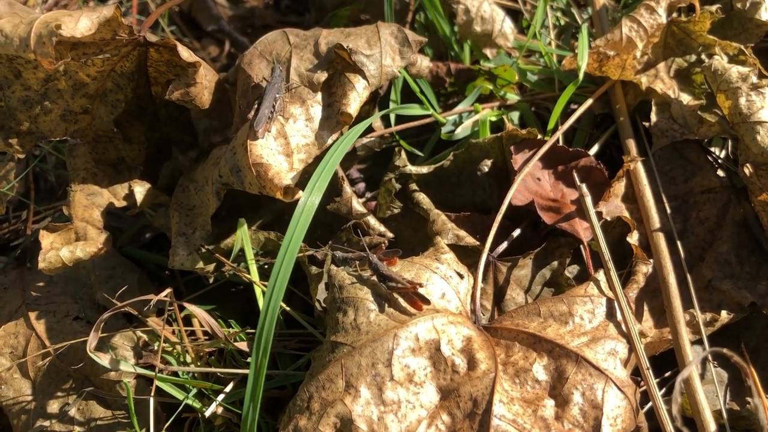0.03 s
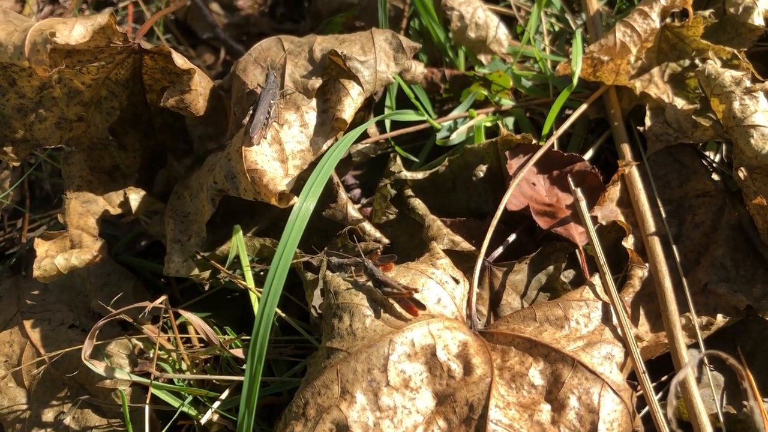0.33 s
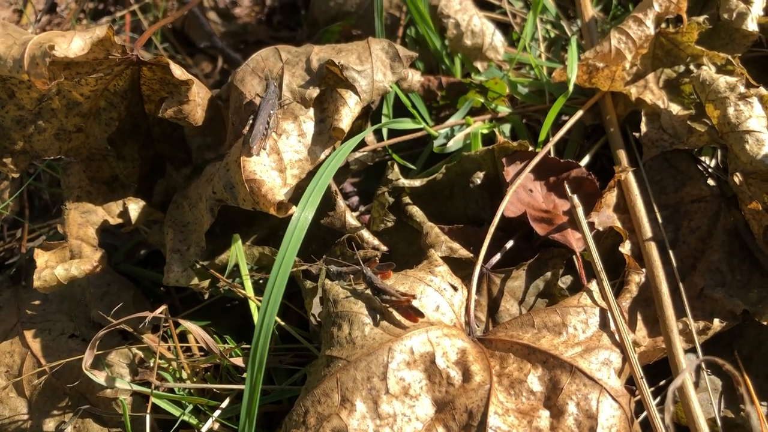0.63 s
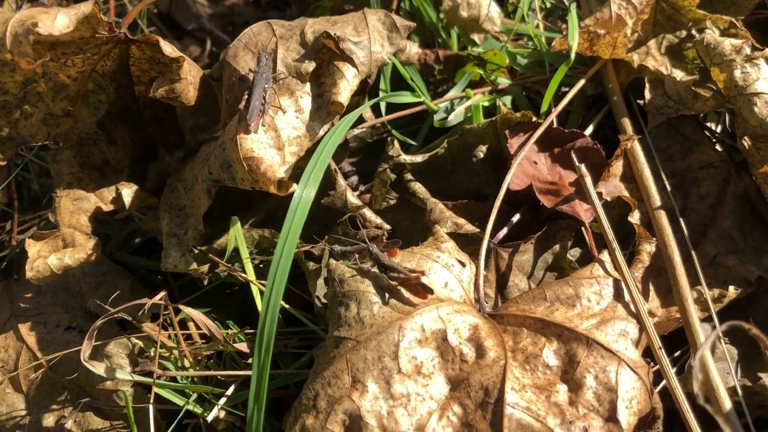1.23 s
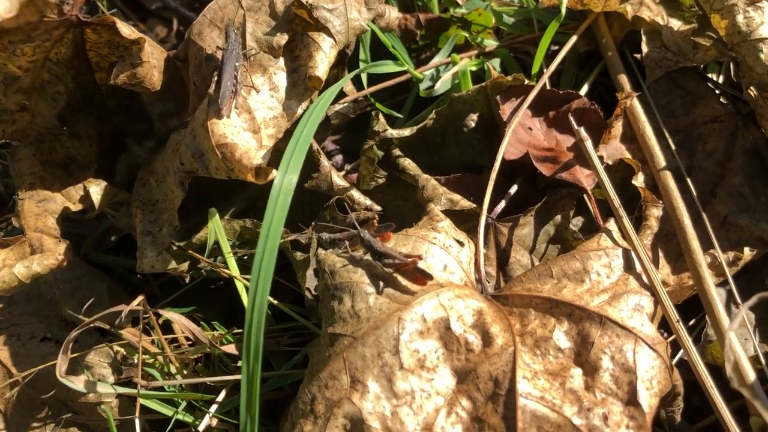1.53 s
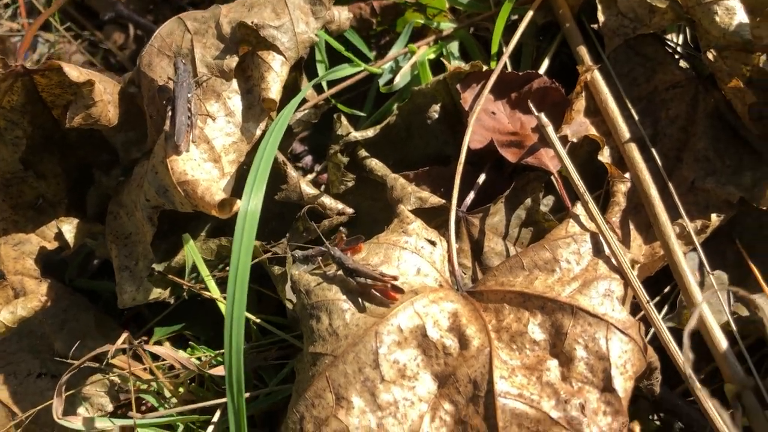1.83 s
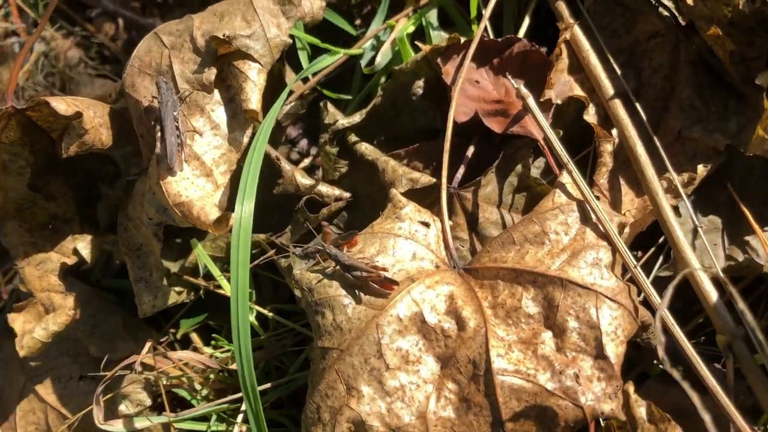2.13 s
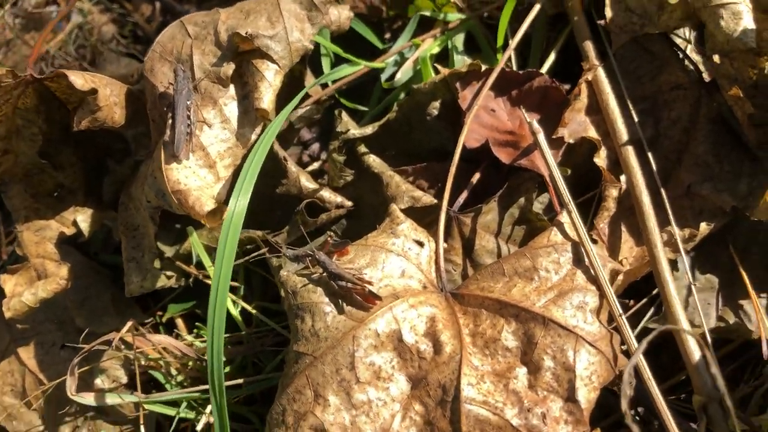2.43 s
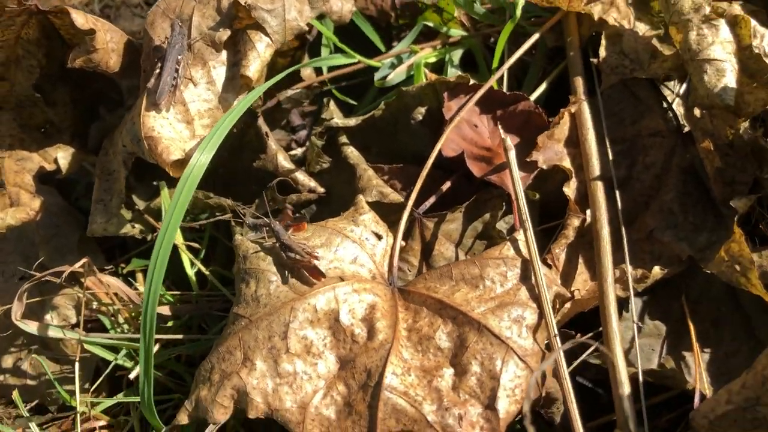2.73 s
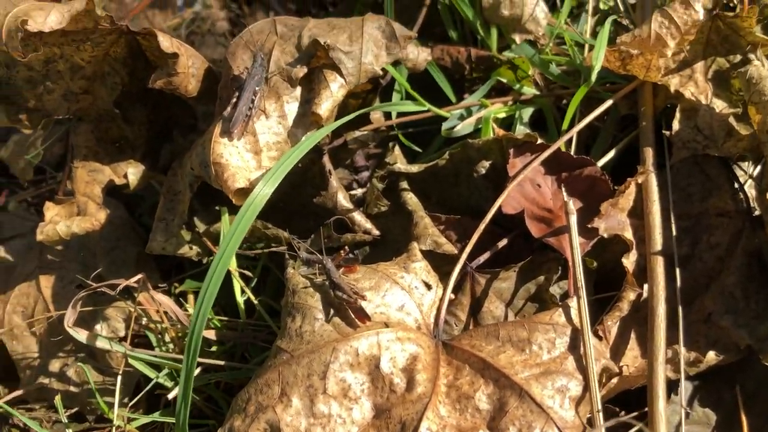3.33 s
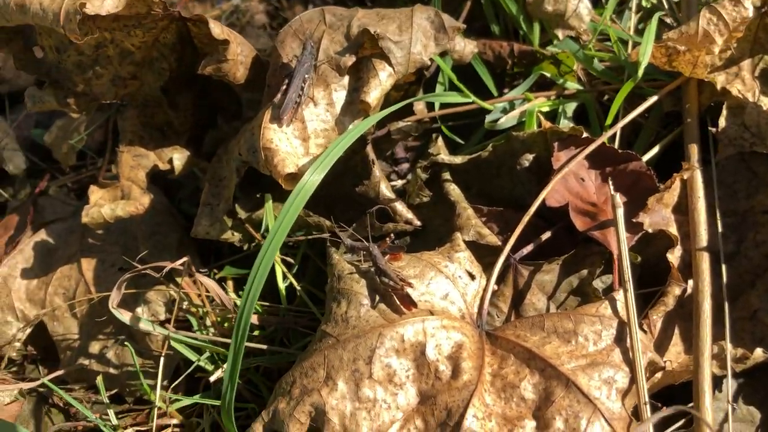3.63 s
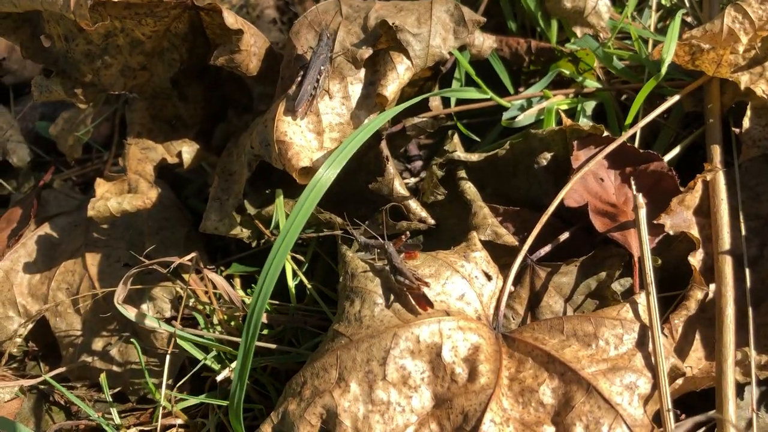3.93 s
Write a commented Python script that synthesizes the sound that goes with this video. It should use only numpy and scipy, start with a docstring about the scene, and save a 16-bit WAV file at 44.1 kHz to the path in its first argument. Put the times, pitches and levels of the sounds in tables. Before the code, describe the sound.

A grasshopper chirps close by, eleven short, high rasps from about 0.2 to 3.1 seconds, roughly a third of a second apart, each a burst of quick scrapes. Dry leaves tick faintly near 1.9 and 2.9 seconds, then crackle in small crisp clusters from 3.1 to 3.8 seconds. Throughout, distant traffic rumbles softly with a wavering engine drone under a faint hiss.

```python
"""On sunlit dry leaves a grasshopper rasps eleven short chirps, each a burst of quick scrapes
of its leg files over the wings. Around the last chirp and just after it the leaves crackle as
their fibres snap, and the litter scatters every close sound. Far traffic rumbles, with a fading
tyre roar and two droning engines, under a faint hiss."""
import sys
import numpy as np
from scipy import signal
from scipy.fft import rfft, irfft
from scipy.io import wavfile

SR = 44100
rng = np.random.default_rng(int(sys.argv[2]) if len(sys.argv) > 2 else 0)


def transcribe(u):
    """Save the signal u as a 16-bit wav file named by the first command-line argument.

    u: samples, shape (n,) or (channels, n), limited to [-1, 1]; the rate is SR.
    q: integer samples, one column per channel.
    """
    v = np.clip(np.atleast_2d(u).T, -1, 1)
    q = np.round(v * 32767).astype(np.int16)
    wavfile.write(sys.argv[1], SR, q)


N = 176400

# strokes of a leg file: (centre time [s], nominal length [s], level [dB], treble over bass [dB])
LEG_SCRAPES = [(0.226, 0.012, -51.5, -3), (0.247, 0.0088, -48, 2.5), (0.261, 0.0071, -41.5, 5),
               (0.265, 0.0036, -32, 11.5), (0.2793, 0.0056, -40, 9.5), (0.2916, 0.004, -38.5, 6),
               (0.299, 0.01, -38, 13), (0.3155, 0.0049, -38.5, 12.5), (0.5174, 0.015, -52.5, -0.0),
               (0.526, 0.0074, -56, 1.1), (0.5355, 0.0044, -42.5, -2), (0.5406, 0.0068, -48.5, -3.5),
               (0.547, 0.0036, -39.5, -1), (0.552, 0.0044, -43, -1), (0.5562, 0.0043, -30.5, 13.5),
               (0.563, 0.0055, -42, 9.5), (0.5761, 0.0065, -40.5, 8), (0.5837, 0.006, -35, 14.5),
               (0.5979, 0.0045, -43.5, 8.5), (0.819, 0.013, -53, 1.4), (0.8366, 0.0064, -44, 0.5),
               (0.8469, 0.0043, -40, -1.3), (0.8565, 0.0043, -31, 12.5), (0.8634, 0.0058, -38, 2),
               (0.8764, 0.0064, -38, 9.5), (0.8836, 0.0071, -37.5, 8), (0.8903, 0.0056, -51, 1.5),
               (0.898, 0.0048, -38.0, 10), (0.9073, 0.01, -52, -1.4), (1.1504, 0.017, -51.5, -1.5),
               (1.1651, 0.0072, -44.5, -3.5), (1.1719, 0.0057, -50, -0.8), (1.1781, 0.0049, -34, 2.5),
               (1.1838, 0.0059, -41, 6), (1.1887, 0.0026, -38, 0), (1.196, 0.004, -35, 6.5),
               (1.203, 0.0045, -41, 12.5), (1.216, 0.0071, -55.5, 0.86), (1.4948, 0.0076, -52, -1.3),
               (1.5129, 0.0056, -40, -0.9), (1.5243, 0.0039, -29.5, 10.5), (1.532, 0.0074, -43, 5),
               (1.543, 0.0037, -39, -0.7), (1.5487, 0.0037, -36.5, 3.5), (1.555, 0.006, -38.5, 6),
               (1.5614, 0.0058, -48.5, 0.9), (1.572, 0.0063, -42, -0.74), (1.578, 0.0054, -49, -4),
               (1.5884, 0.016, -52.5, -1), (1.761, 0.017, -53.5, 0.5), (1.7892, 0.0054, -34.5, 3),
               (1.8108, 0.0043, -42, 11.5), (1.8202, 0.0031, -31, 14), (1.8277, 0.0037, -34, 9.5),
               (1.84, 0.0036, -32, 12.0), (1.849, 0.004, -39, 5.5), (1.865, 0.005, -43, 6),
               (2.0496, 0.01, -49, 4), (2.069, 0.0097, -45, 0.8), (2.0877, 0.0042, -47.5, -2.5),
               (2.0942, 0.0045, -47, -1.65), (2.1015, 0.0047, -43.5, -3.5), (2.113, 0.0031, -51.5, -2.5),
               (2.1203, 0.011, -54.5, 1.5), (2.2535, 0.014, -50.5, -1.2), (2.2718, 0.0055, -45.5, 1),
               (2.2836, 0.0043, -34.5, 8), (2.293, 0.0046, -32, 13), (2.2986, 0.005, -40.5, 4),
               (2.3123, 0.0027, -32, 13.5), (2.3216, 0.0057, -35.5, 15), (2.3308, 0.0052, -41, 6),
               (2.3384, 0.007, -39.5, 10.5), (2.3435, 0.0023, -33.5, 14.5), (2.3546, 0.0036, -34.5, 9.5),
               (2.3615, 0.0061, -49.5, 3.5), (2.5883, 0.0148, -54, -4), (2.6062, 0.0052, -42, -5),
               (2.618, 0.0045, -37, 4.5), (2.6239, 0.0079, -50, 6.5), (2.6297, 0.0042, -44, -1.4),
               (2.6357, 0.0065, -42.5, 3.5), (2.6442, 0.004, -42, 10), (2.6483, 0.0063, -44.5, -3),
               (2.66, 0.0092, -48, -2.5), (2.667, 0.0053, -38.5, 0.5), (2.6824, 0.014, -56.5, -1),
               (2.8096, 0.016, -56, -4), (2.829, 0.004, -48, -2), (2.841, 0.0042, -43.5, -0.5),
               (2.8513, 0.0051, -31, 16.5), (2.8566, 0.0065, -45, 3.5), (2.872, 0.003, -34.5, 14),
               (2.8795, 0.0063, -36, 14), (2.8927, 0.0057, -34.5, 12.5), (2.9002, 0.0058, -36.5, 6.5),
               (2.9144, 0.0064, -36.5, 14.5), (3.0854, 0.0091, -51, -1), (3.105, 0.0075, -44.5, -4),
               (3.1154, 0.0049, -35, 2), (3.125, 0.0045, -40.5, 1.5), (3.135, 0.0047, -48.5, -7)]
# resonant colour of the wings: (frequency [Hz], relative gain [dB])
WING_COLOUR = [(600, -42), (1500, -22), (2500, -8.5), (3200, -11), (3700, -4.5), (4100, -8), (5000, -2.5),
               (7000, -1), (8900, 2.5), (10500, -2.5), (12500, -4.5), (16000, -6)]
# resonant colour of the dry leaves: (frequency [Hz], relative gain [dB])
LEAF_COLOUR = [(250, -1), (700, -2.5), (1050, -11.5), (1400, -0.5), (1900, -4.5), (3200, -1.5), (4800, 1),
               (7500, -1.5), (10000, -7.5), (15500, -12)]


def from_db(db):
    """Decibels to gain."""
    return 10 ** (np.asarray(db) / 20)


def rms_one(x):
    """Scale to an rms of one."""
    return x / np.sqrt(np.mean(x ** 2) + 1e-20)


def automation(rows):
    """Each column of a breakpoint curve at every sample."""
    times, *columns = np.transpose(rows)
    return [np.interp(np.arange(N) / SR, times, column) for column in columns]


def drift(rate_hz):
    """Smooth random motion with an rms of one, mostly slower than rate_hz."""
    hz = np.arange(N // 2 + 1) * SR / N
    return rms_one(irfft(rfft(rng.standard_normal(N)) / (1 + (hz / rate_hz) ** 2), N))


def coloured(x, points):
    """Minimum-phase EQ through the given points; keeps the level of white noise."""
    size = 2 * N
    hz, db = np.transpose(points)
    gain = rms_one(from_db(np.interp(np.log(np.arange(N + 1) * SR / size + 1), np.log(hz), db)))
    cepstrum = irfft(np.log(gain))
    cepstrum[1:N] *= 2
    cepstrum[N + 1:] = 0
    return irfft(rfft(x, size) * np.exp(rfft(cepstrum)))[:N]


def crossover(x, hz):
    """Bass and treble halves that add up flat."""
    halves = [signal.butter(2, hz, kind, fs=SR, output="sos") for kind in ("low", "high")]
    return [signal.sosfilt(np.vstack([sos, sos]), x + 1e-18) for sos in halves]


def butterworth(x, order, hz, kind):
    """Low-, high- or band-pass filter."""
    return signal.sosfilt(signal.butter(order, hz, kind, fs=SR, output="sos"), x)


def add(out, start_s, sound):
    """Mix a sound in from its start time."""
    i = int(start_s * SR)
    out[i:i + len(sound)] += sound[:N - i]


def faint_hiss():
    """A steady, airy bed of noise."""
    # colour of the hiss: (frequency [Hz], relative gain [dB])
    hiss_colour = [(1000, -2.5), (3000, 6), (5000, 0.5), (7000, 1), (9500, 0.5), (11300, 11), (12400, 8),
                   (13600, 1), (15500, 1.5)]
    return from_db(-74.5) * coloured(rng.standard_normal(N), hiss_colour)


def traffic_rumble():
    """Far traffic merges into a low, gently wavering noise."""
    # colour of the rumble: (frequency [Hz], relative gain [dB])
    rumble_colour = [(33, -28.5), (52, -3), (80, -2), (115, -0.5), (140, -3), (180, 1), (225, -7),
                     (300, -11), (450, -21), (700, -27), (1100, -30), (2200, -35.5), (5000, -51)]
    return from_db(-56.5 + drift(6.7)) * coloured(rng.standard_normal(N), rumble_colour)


def tyre_roar():
    """A far vehicle's tyres give a band of noise that wavers as it fades."""
    # fade of the roar: (time [s], level [dB])
    fade = [(.6, -73), (1.9, -78.5)]
    level_db, = automation(fade)
    roar = rms_one(butterworth(rng.standard_normal(N), 2, (300, 640), "band"))
    return from_db(level_db + 2 * drift(11)) * roar


def far_engines():
    """Two engines sink slowly in pitch; only their wavering firing notes carry this far."""
    # firing note of each engine: (time [s], pitch [Hz], level [dB])
    low_engine = [(0, 103.5, -57), (.3, 100.7, -56), (.5, 102.2, -51.5), (.72, 100.8, -61),
                  (.88, 100.8, -52.5), (1.2, 96.74, -70)]
    high_engine = [(0, 205, -66.5), (1.1, 200, -64.5), (1.3, 198, -55.5), (1.7, 194, -65), (2, 190, -56.5),
                   (2.4, 188, -52), (2.8, 183, -60.5), (3.1, 181, -67.5), (3.45, 178, -73.5),
                   (3.8, 175, -49.5), (4, 171, -61.5)]
    out = np.zeros(N)
    for engine in (low_engine, high_engine):
        hz, db = automation(engine)
        phase = 2 * np.pi * np.cumsum(hz * (1 + .003 * drift(9.1))) / SR
        out += from_db(db + drift(3.6)) * np.sin(phase)
    return out


def litter_scatter(x):
    """Dense, quickly dying reflections from the leaves around."""
    level_db, t60_s = -27.5, .038
    t = np.arange(SR // 10) / SR
    tail = rng.standard_normal(len(t)) * from_db(-60 * t / t60_s)
    return from_db(level_db) * signal.fftconvolve(x, tail / np.sqrt(np.sum(tail ** 2)))[:N]


def fibre_snaps(per_s, spread_db):
    """Leaf fibres snap at random, mostly small, a few large: each a dry click and a brief ring."""
    ring_cycles = 38   # to die away by 60 dB
    sizes = from_db(spread_db * np.minimum(rng.exponential(1, N), 4)) * rng.choice([-1, 1], N)
    clicks = sizes * (rng.random(N) < per_s / SR)
    pitches = np.geomspace(900, 15000, 24)
    pitch_index = rng.choice(len(pitches), N, p=pitches / pitches.sum())
    rings = np.zeros(N)
    for k, hz in enumerate(pitches):
        radius, angle = from_db(-60 * hz / (ring_cycles * SR)), 2 * np.pi * hz / SR
        feed = np.sqrt(1 - radius) * np.array([1, 0, -1])
        feedback = [1, -2 * radius * np.cos(angle), radius ** 2]
        rings += signal.lfilter(feed, feedback, clicks * (pitch_index == k) + 1e-18)
    return coloured(rms_one(rms_one(rings) + rms_one(clicks)), LEAF_COLOUR)


def leaf_stir():
    """The litter stirs with faint ticks, loudest between the closing crackles."""
    # swell of the stirring: (time [s], level [dB])
    swell = [(0, -72), (.2, -83.5), (1.7, -84), (2.1, -78), (2.8, -76), (3.1, -77), (3.3, -63.5),
             (3.5, -64.5), (3.6, -86), (3.72, -61), (3.82, -83.5), (4, -75.5)]
    level_db, = automation(swell)
    return from_db(level_db) * fibre_snaps(per_s=2000, spread_db=3)


def leaf_crackles():
    """A leaf gives way: one sharp break and a dying shower of snaps set a piece of it ringing."""
    # breaks: (time [s], relative level [dB], decay t60 [s], bass gain [dB], ring pitch [Hz])
    crackles = [(1.942, -57.5, 0.028, -2, 7280), (2.947, -53, 0.032, -1, 4100),
                (3.1405, -45, 0.05, -17, 5170), (3.1455, -43.5, 0.042, -11, 8400),
                (3.1513, -36, 0.066, 1, 4885), (3.1557, -45, 0.025, 7, 1402), (3.17, -46, 0.053, 4, 3585),
                (3.201, -46.5, 0.043, 9, 4550), (3.2307, -51, 0.045, 9, 5000),
                (3.2552, -44, 0.023, 1, 4840), (3.273, -55, 0.068, 2, 7600), (3.3084, -42, 0.04, -3, 6200),
                (3.32, -42.5, 0.024, -5, 5260), (3.3239, -40, 0.049, -5, 5200), (3.333, -49, 0.05, 1, 5050),
                (3.344, -50.5, 0.11, 4, 5400), (3.3537, -43, 0.016, -13, 5960),
                (3.3718, -50, 0.05, 6, 5710), (3.44, -37.5, 0.011, -28, 7470),
                (3.446, -47, 0.014, -7, 7000), (3.457, -54.5, 0.037, -1, 5050),
                (3.4655, -50, 0.016, 0, 7150), (3.508, -50.5, 0.07, 0, 5400),
                (3.5218, -46, 0.062, -4.5, 13600), (3.531, -55, 0.034, 1, 8900),
                (3.539, -49.5, 0.047, -2, 12000), (3.6537, -47.5, 0.05, -1, 7200),
                (3.671, -49, 0.018, 0, 4770), (3.675, -51.5, 0.042, 5, 4760), (3.682, -45, 0.018, 5, 4540),
                (3.694, -42, 0.024, -8, 6520), (3.706, -49.5, 0.014, -1, 9000),
                (3.7137, -49, 0.066, 14, 5000), (3.7269, -37, 0.039, -1, 7040),
                (3.7323, -44, 0.054, 0, 4970), (3.766, -54.5, 0.04, 7, 6040)]
    attack_s, first_break_s = .0005, .001
    ring_q, ring_db, trim_db = 7.3, 5.5, -1.5
    low, high = crossover(fibre_snaps(per_s=6000, spread_db=2.5), hz=4000)
    t, out = np.arange(SR // 10) / SR, np.zeros(N)
    first_break = 1 + .9 * np.exp(-t / first_break_s)
    for start_s, db, t60_s, bass_db, ring_hz in crackles:
        at = int(start_s * SR) + np.arange(len(t))
        envelope = np.minimum(t / attack_s, 1) * from_db(-60 * t / t60_s) * first_break
        shower = envelope * (from_db(bass_db) * low[at] + high[at])
        ring = from_db(ring_db) * signal.lfilter(*signal.iirpeak(ring_hz, ring_q, fs=SR), shower)
        gain = from_db(db + trim_db) * np.sqrt(np.mean(envelope ** 2))
        add(out, start_s, gain * rms_one(shower + ring))
    return out


def rubbed_wing(rubbing):
    """The file's quickly changing grip roughens the rubbing, and the wing colours it."""
    grip = from_db(2.8 * drift(1060))
    return coloured(rubbing * grip, WING_COLOUR)


def leg_drag():
    """The leg brushes on after each scrape, faint and dull, filling the chirp and trailing off."""
    level_db, length_s, centre_hz = -68.5, .02, 3650
    brush = rubbed_wing(rng.standard_normal(N))
    brush = rms_one(signal.lfilter(*signal.iirpeak(centre_hz, Q=2, fs=SR), brush))
    contact = np.zeros(N)
    for centre_s, *_ in LEG_SCRAPES:
        add(contact, centre_s, np.hanning(int(length_s * SR)))
    return from_db(level_db) * np.minimum(contact, 1) * brush


def tooth_clicks(rate_hz):
    """The file's slightly uneven teeth strike the wing one by one."""
    gap_jitter, spread_db = .1, .5
    gaps = np.maximum(1 + gap_jitter * rng.standard_normal(N), .1)
    hit_samples = np.interp(np.cumsum(gaps), np.cumsum(rate_hz) / SR, np.arange(N))
    sizes = from_db(spread_db * rng.standard_normal(N)) * (hit_samples < N - 1)
    oversampled = np.bincount((2 * hit_samples).astype(int), sizes, 2 * N)
    _, clicks = crossover(signal.resample_poly(oversampled, 1, 2), hz=330)
    return rms_one(clicks)


def grasshopper():
    """Each scrape drags a row of teeth over the wing, speeding up, then slowing; fast ones are bright."""
    base_tooth_hz, end_slowing_octaves, friction_db = 7190, .9, -8.5
    edge_hz, split_hz, top_hz = 3760, 6440, 10600
    mean_db = np.mean([db for _, _, db, _ in LEG_SCRAPES])
    tooth_hz, strokes = np.full(N, float(base_tooth_hz)), []
    for centre_s, length_s, db, bright_db in LEG_SCRAPES:
        n = int(1.1 * length_s * SR)
        at = int(centre_s * SR) - n // 2 + np.arange(n)
        # the stroke peaks just past its middle
        swell = np.sin(np.pi * np.interp(np.linspace(0, 1, n), [0, .56, 1], [0, .5, 1]))
        peak_octaves = .3044 * bright_db - .0175 * (db - mean_db) + .12 * rng.standard_normal()
        tooth_hz[at] = base_tooth_hz * 2 ** (peak_octaves - end_slowing_octaves * (1 - swell))
        strokes.append((at, np.abs(swell) ** 1.1, db, bright_db))
    teeth = tooth_clicks(tooth_hz)
    # rubbing noise is strongest where the file moves slowly
    friction = from_db(friction_db) * (base_tooth_hz / tooth_hz) * rng.standard_normal(N)
    wing = butterworth(rubbed_wing(teeth + friction), 10, 16000, "low")
    body, top = crossover(wing, top_hz)
    low, high = crossover(body, split_hz)
    top = sum(crossover(top, split_hz))   # kept in phase with the body
    out = np.zeros(N)
    for at, envelope, db, bright_db in strokes:
        tilt = from_db(bright_db)
        bands = np.array([low[at], high[at] + tilt ** .83 * top[at]])   # bright scrapes get extra top
        low_cut_hz = edge_hz * 2 ** (.04 * (db - mean_db))   # hard scrapes are thinner
        bass, treble = butterworth(envelope * bands, 4, low_cut_hz, "high")
        scrape = from_db(-.5) * rms_one(bass) + from_db(-2) * tilt * rms_one(treble)
        out[at] += from_db(db) * scrape / np.sqrt(2 * (1 + tilt ** 2))
    return out


def scene():
    """Insect and leaves close by, traffic far off, in mono."""
    near = grasshopper() + leg_drag() + leaf_crackles() + leaf_stir()
    scatter = litter_scatter(near)
    background = traffic_rumble() + faint_hiss() + tyre_roar() + far_engines()
    return (near + scatter + background)[None]


def record(dry):
    """A steep low-pass takes off the very top."""
    cutoff_hz = 15850
    return signal.sosfilt(signal.ellip(10, .2, 70, cutoff_hz, fs=SR, output="sos"), dry)


dry = scene()
out = record(dry)
transcribe(out)
```